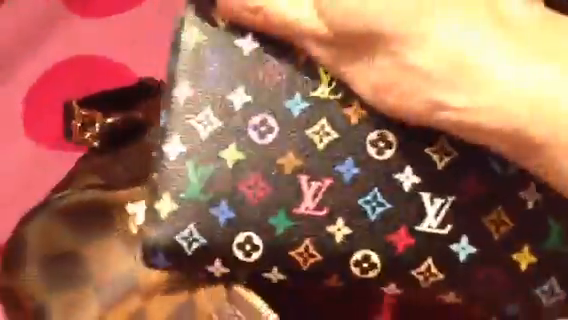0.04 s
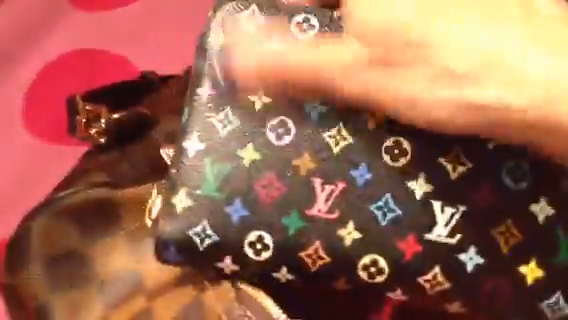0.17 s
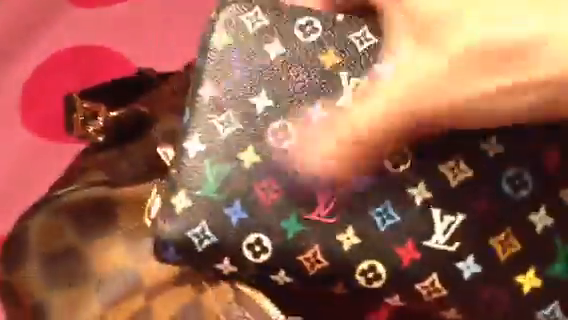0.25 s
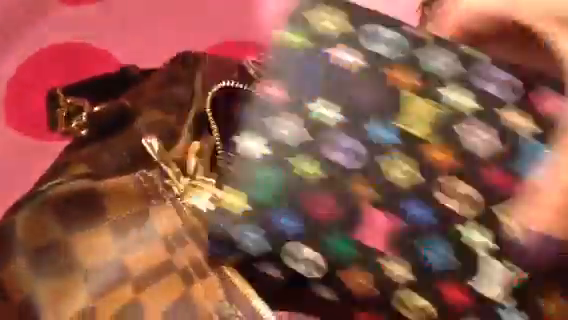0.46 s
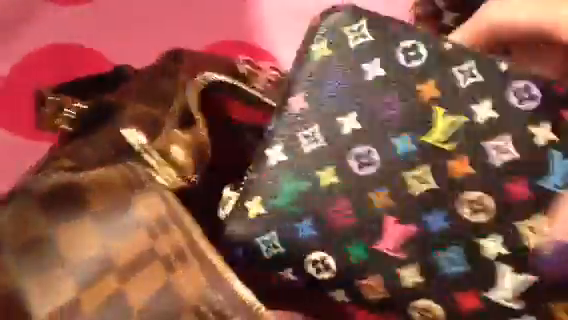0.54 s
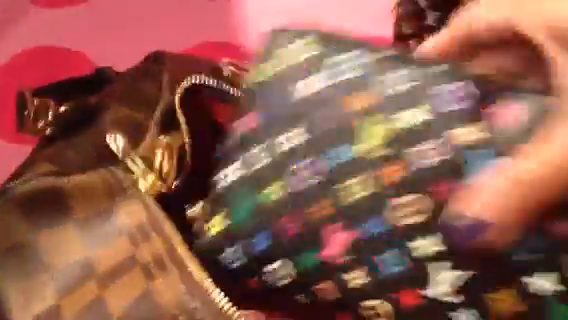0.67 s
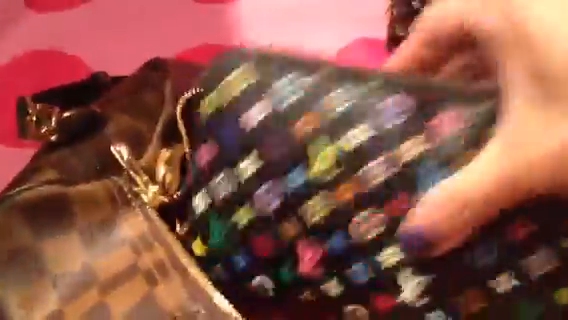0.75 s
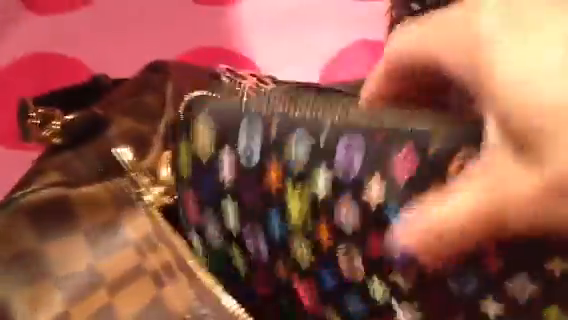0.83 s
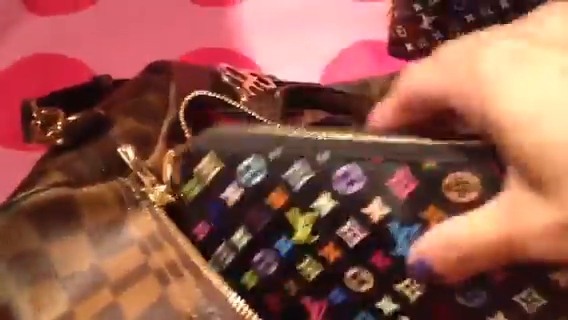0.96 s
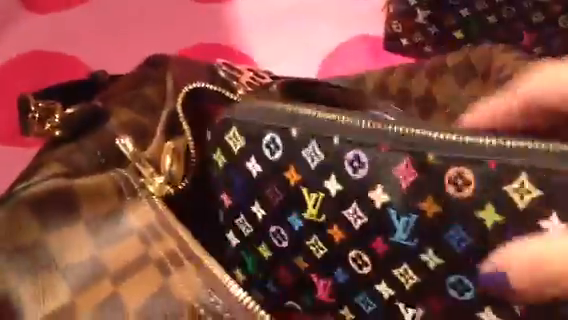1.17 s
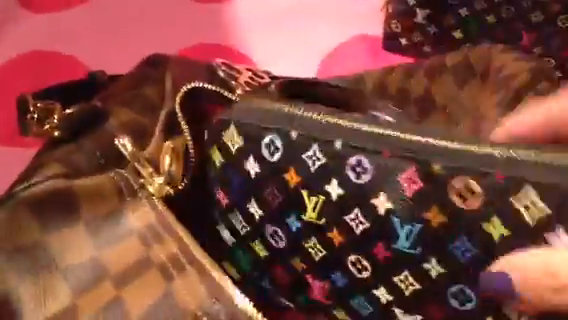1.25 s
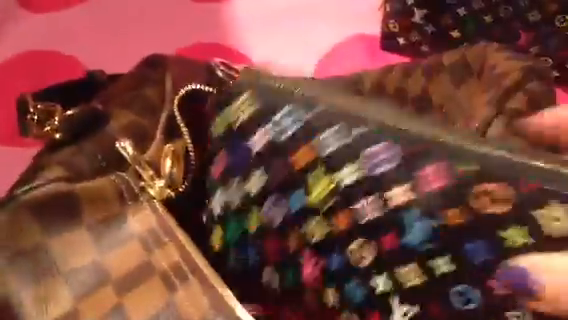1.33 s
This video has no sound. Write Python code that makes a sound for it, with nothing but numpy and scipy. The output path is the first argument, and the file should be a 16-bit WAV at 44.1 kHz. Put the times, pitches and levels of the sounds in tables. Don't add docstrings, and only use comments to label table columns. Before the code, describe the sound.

A stiff coated zip wallet is handled against a soft handbag, heard close and dry. Soft bumps and faint metal ticks open, with a rubbing swish around 0.25-0.35 s. The loudest knocks, hollow thumps and zip snaps cluster at 0.42-0.5 s, followed by crisp ticks to 0.6 s. After a lull, creaks and knocks return at 0.7-0.95 s, brightest near 0.88 s; sparse light clicks fade into quiet room hiss until 1.4 s.

```python
import sys
import numpy as np
from scipy import signal
from scipy.io import wavfile

SR = 44100
rng = np.random.default_rng(int(sys.argv[2]) if len(sys.argv) > 2 else 0)


def persist_wave(psi):
    counts = np.round(np.clip(psi, -1, 1) * 32767).astype(np.int16)
    wavfile.write(sys.argv[1], SR, np.atleast_2d(counts).T)


def ratio_of_db(decibels):
    return 10 ** (np.asarray(decibels, float) / 20)


N = 61739

# pitch_hz, level_db, t60_s
PANEL_MODES = [(470, -10, .016), (620, -9, .014), (870, -9, .018), (1070, -7, .02), (1240, -3, .022),
               (1370, 0, .024), (1560, -8, .018), (1960, -2, .024), (2350, -7, .018), (2770, -12, .014),
               (3400, -10, .014), (4400, -12, .01)]


def rms_one(x):
    return x / np.sqrt(np.mean(x ** 2) + 1e-20)


def peak_one(x):
    return x / np.max(np.abs(x))


def filtered(x, order, hz, kind="low"):
    return signal.sosfilt(signal.butter(order, hz, kind, fs=SR, output="sos"), x)


def in_time(rows):
    time_s, level_db = np.transpose(rows)
    return np.interp(np.arange(N) / SR, time_s, level_db)


def drift(rate_hz):
    r = np.exp(-2 * np.pi * rate_hz / SR)
    settle = 8000
    noise = rng.standard_normal(N + settle)
    return rms_one(signal.lfilter([1], [1, -2 * r, r * r], noise)[settle:])


def ring(x, hz, t60_s):
    r = ratio_of_db(-60 / (max(t60_s, .001) * SR))
    w = 2 * np.pi * hz / SR
    return signal.lfilter([0, np.sin(w)], [1, -2 * r * np.cos(w), r * r], x + 1e-18)


def grains(per_s, spread_db):
    excess = np.minimum(rng.exponential(1, N), 3)
    sizes = ratio_of_db(spread_db * excess) * rng.choice([-1, 1], N)
    return sizes * (rng.random(N) < per_s / SR)


def coloured(pair, spectrum, patch_db, tilt_db):
    out = 0
    edges_hz = 30 * 2 ** np.arange(0, 9.4, 1 / 3)
    hz, db = np.transpose(spectrum)
    for k, (low, high) in enumerate(zip(edges_hz, edges_hz[1:])):
        band = filtered(pair[k % 2], 2, [low, high], "band")
        mid = np.sqrt(low * high)
        gain_db = np.interp(np.log(mid), np.log(hz), db) + patch_db * drift(22.5)
        out = out + band * ratio_of_db(gain_db + tilt_db * np.log2(mid / 4000))
    return rms_one(out)


def contact(noise, length_s):
    phase = np.clip(np.arange(len(noise)) / SR / max(length_s, 3e-4), 0, 1)
    return rms_one(noise * np.sin(np.pi * phase ** 0.4)) / np.sqrt(len(noise))


def add(out, start_s, x):
    i = int(start_s * SR)
    out[i:i + len(x)] += x[:N - i]


def rub():
    # time_s, level_db
    rub_speed = [(0, -63.5), (.09, -68), (.125, -57.5), (.26, -48.5), (.335, -49.5), (.36, -61.5),
                 (.39, -55), (.48, -52.5), (.525, -54.5), (.555, -55), (.63, -71.5), (.685, -64.5),
                 (.7, -62), (.86, -59.5), (.905, -50), (.97, -62.5), (1.06, -64.5), (1.08, -58),
                 (1.4, -65.5)]
    # frequency_hz, density_db (per Hz)
    rub_colour = [(500, -3), (1100, -10), (2000, -3), (4000, -1.5), (7800, -7.5), (10500, -18),
                  (13500, -20.5), (15500, -37)]
    level_db = in_time(rub_speed)
    slips = [grains(per_s=6000, spread_db=2.5) for source in range(2)]
    finer_db = 0.11 * (level_db - level_db.mean())
    return ratio_of_db(level_db + drift(44)) * coloured(slips, rub_colour, 2.5, finer_db)


def grip():
    # time_s, level_db
    grip_pressure = [(0, -57.5), (.1, -95.5), (.15, -69), (.4, -59.5), (.44, -45.5), (.51, -51.5),
                     (.57, -56), (.63, -79), (.685, -69), (.7, -47), (.79, -54.5), (.86, -51.5), (.92, -50),
                     (.97, -64.5), (1.03, -58.5), (1.05, -65), (1.1, -79), (1.4, -60)]
    # pitch_hz, level_db, t60_s
    cavity_modes = [(165.0, -3, 0.045), (239, -7.0, 0.055), (297, 0.5, 0.033), (347, 3, 0.024)]
    slips_per_s, bag_spread_db, creak_spread_db = 990, 2, 9
    bag = sum(ratio_of_db(db) * ring(grains(slips_per_s, bag_spread_db), hz, t60_s)
              for hz, db, t60_s in cavity_modes)
    creak = sum(ratio_of_db(db) * ring(grains(slips_per_s, creak_spread_db), hz, t60_s)
                for hz, db, t60_s in PANEL_MODES[1:8])
    mutter = ratio_of_db(-5 + 1.8 * drift(34)) * rms_one(filtered(bag, 2, 480))
    creak = ratio_of_db(-6 + 1.6 * drift(30)) * rms_one(creak)
    return ratio_of_db(in_time(grip_pressure)) * (mutter + creak)


def room_tone():
    # frequency_hz, density_db (per Hz)
    floor_colour = [(30, 29.5), (70, 5.5), (160, 8), (320, -2), (800, -7), (4400, -16), (8000, -29),
                    (10500, -23), (14500, -20.5)]
    noise = rng.standard_normal((2, N))
    return ratio_of_db(-62) * coloured(noise, floor_colour, patch_db=2.1, tilt_db=0.5)


def bumps():
    # start_s, level_db (peak), pitch_hz
    bag_pushes = [(0.008, -45.5, 294), (0.053, -48, 260), (0.067, -46, 274), (0.098, -49, 240),
                  (0.128, -46.5, 207), (0.142, -41, 310), (0.162, -45.5, 350), (0.217, -44.5, 288),
                  (0.239, -51.5, 362), (0.297, -42, 258), (0.331, -41, 320), (0.4212, -34.5, 257),
                  (0.4427, -25.5, 292), (0.4483, -30, 295), (0.4563, -34.5, 287), (0.4636, -40, 303),
                  (0.469, -28.5, 292), (0.4815, -23.5, 267), (0.497, -25, 301), (0.559, -40, 273),
                  (0.6952, -39, 329), (0.728, -44.5, 362), (0.762, -42, 297), (0.8241, -36.5, 430),
                  (0.876, -32.5, 333), (0.952, -46, 292), (1.029, -61, 286), (1.09, -38, 367),
                  (1.116, -45.5, 320), (1.276, -47.5, 399), (1.337, -50.5, 362), (.114, -55, 305),
                  (0.203, -56, 270), (0.265, -56, 308), (.320, -46, 295), (.351, -45, 300),
                  (0.362, -46, 334), (0.375, -42, 288), (.517, -44, 270), (.527, -37, 272),
                  (0.912, -43, 262), (0.983, -56, 270), (1.154, -55, 270), (1.226, -61, 385),
                  (1.298, -56, 306), (1.365, -51, 365)]
    out = np.zeros(N)
    soft = filtered(np.eye(1, 6000)[0], 2, 552)
    for start_s, level_db, pitch_hz in bag_pushes:
        add(out, start_s, ratio_of_db(level_db) * ring(soft, pitch_hz, t60_s=0.042))
    return filtered(out, 1, 163, "high")


def knocks():
    knock_times = [.113, .127, .145, .243, .427, .443, .4495, .456, .4643, .480, .4968, .650, .695, .701,
                   .710, .730, .738, .770, .807, .8245, .856, .873, .878, .900, .921, .956, 1.082, 1.089,
                   1.339, 1.365, .170, .368, .946, .7205, .746, 1.229, 1.262, 1.032, .4825]
    # level_db (peak), contact length_s, brightness_db (per octave)
    knock_kinds = [(-41.5, 0.003, -17), (-41, 0.0021, -22), (-43, 0.0014, -29), (-37, 0.0039, -33),
                   (-35.5, 0.0044, 2), (-27, 0.00074, -12), (-22.5, 0.00026, -11), (-34.5, 0.00036, 0),
                   (-29.5, 0.00081, -3), (-27, 0.00048, -9), (-35, 0.0014, -18), (-61, 0.0015, 3),
                   (-39, 0.0054, -6), (-39, 0.0065, 2), (-38, 0.0028, -16), (-37, 0.0039, 0),
                   (-42, 0.011, -8), (-39, 0.0073, -7), (-38.5, 0.0021, -6), (-27, 0.0057, -7.5),
                   (-39, 0.027, 0), (-30.5, 0.0075, 9.5), (-24.5, 0.0058, -1.5), (-34, 0.015, 3),
                   (-43, 0.0065, -16), (-43.5, 0.011, -8), (-39.5, 0.0034, -6), (-47, 0.0042, -4),
                   (-44, 0.0035, -8), (-44.5, 0.0045, -1), (-41.5, 0.0032, 3), (-44, 0.0037, -10),
                   (-45, 0.0022, -9), (-48, 0.0064, 8), (-47, 0.0022, -8), (-49.5, .002, -19),
                   (-43.5, .004, -7), (-43.5, 0.0032, 12), (-31, 0.0026, -6)]
    scatter_db, damping, trim_db = 1.5, .85, -2.5
    out = np.zeros(N)
    noise = rng.standard_normal((len(knock_kinds), 2000))
    scatter = rng.standard_normal((len(knock_kinds), len(PANEL_MODES)))
    for start_s, (level_db, length_s, bright_db), row, uneven in zip(knock_times, knock_kinds, noise, scatter):
        touch = contact(row, length_s)
        body = 0
        for (hz, mode_db, t60_s), chance in zip(PANEL_MODES, uneven):
            gain_db = mode_db + scatter_db * chance + (bright_db + 4) * np.log2(hz / 1350)
            body = body + ratio_of_db(gain_db) * peak_one(ring(touch, hz, damping * t60_s))
        add(out, start_s, ratio_of_db(level_db + trim_db) * peak_one(body))
    return filtered(out, 1, [350, 4800], "band")


def snaps():
    # start_s, level_db (peak)
    tooth_skips = [(0.1136, -44), (.1455, -37.5), (.1785, -36.5), (0.4427, -37), (0.452, -56),
                   (.4563, -25.5), (0.4666, -42), (0.497, -25), (0.6957, -35.5), (0.2929, -48),
                   (0.3697, -58), (0.479, -41), (0.6506, -51), (0.773, -58), (.8075, -54), (1.069, -44)]
    out = np.zeros(N)
    click = peak_one(filtered(np.eye(1, 400)[0], 3, [500, 5500], "band"))
    for start_s, level_db in tooth_skips:
        add(out, start_s, -ratio_of_db(level_db) * click)
    return out


def pings():
    # start_s, level_db (peak)
    tab_taps = [
        (0.14, -50.5),
        (0.177, -50.5),
    ]
    # pitch_hz, level_db, t60_s
    tab_modes = [(5400, -10, .04), (8125, 0, .05), (13750, -9, .05)]
    taps = np.zeros(N)
    for start_s, level_db in tab_taps:
        taps[int(start_s * SR)] = ratio_of_db(level_db)
    return sum(ratio_of_db(db) * ring(taps, hz, t60_s) for hz, db, t60_s in tab_modes)


def ticks():
    tick_times = [.151, .1782, .292, .369, .481, .4968, .4968, .503, .534, .5408, .5412, .5465, .552, .6,
                  .8245, .879, .892, .896, .902, .905, .916, .922, .945, .955, 1.068, 1.083, 1.262, 1.366,
                  .828, .879, .873, .5035, .541, .547, .272, .266, .47, .439, .6505, .7, 1.242, 1.263,
                  .5415, .547, .553, .458, .473, .534, .877, .8255, 1.083, 1.0895, 1.3395, 1.3665, .905]
    # level_db (peak), pitch_hz, contact length_s
    tick_kinds = [(-51, 8400, 0.0033), (-48, 6400, 0.0022), (-38.5, 4400, 0.0018), (-49, 2400, .002),
                  (-37.5, 4400, 0.0023), (-36, 4100, 0.0037), (-42.5, 10000, 0.0017), (-36, 2800, .004),
                  (-35, 4100, 0.0047), (-34.5, 10360, 0.0017), (-31.5, 4220, 0.0056), (-39, 4900, 0.0031),
                  (-39.5, 3650, 0.0045), (-49.5, 2400, 0.0088), (-35, 4970, 0.0093), (-37, 3470, 0.007),
                  (-44, 6900, 0.0037), (-52, 6800, 0.0042), (-44, 6900, 0.0011), (-34, 7700, 0.0046),
                  (-49.5, 7200, 0.0027), (-43.5, 5180, .005), (-47, 7900, 0.0035), (-47, 6300, 0.0066),
                  (-57, 6300, 0.0022), (-45, 3250, 0.012), (-54.5, 3240, 0.0038), (-49, 4100, 0.0051),
                  (-42, 5400, .002), (-46, 12000, 0.0031), (-56, 11000, 0.0074), (-41, 16000, 0.0014),
                  (-60, 15200, 0.00069), (-38, 7700, 0.0031), (-43, 2600, 0.0043), (-45.5, 2170, 0.0033),
                  (-56, 4200, 0.0051), (-39, 3040, 0.0082), (-55, 2200, 0.0028), (-47, 3800, 0.0028),
                  (-50, 3000, 0.002), (-46, 2360, 0.0042), (-35, 2300, 0.0011), (-39.5, 2400, 0.009),
                  (-46, 3500, 0.0092), (-43, 3100, 0.0065), (-47, 4200, 0.016), (-52, 9400, .002),
                  (-34.5, 2000, 0.0067), (-38, 1980, 0.0074), (-43, 1420, 0.0033), (-41, 1500, 0.0088),
                  (-47.5, 1400, 0.0034), (-49.5, 2030, .003), (-39.5, 1880, 0.0054)]
    decay_cycles, crack_db, trim_db = 9, -6, -1
    out = np.zeros(N)
    noise = rng.standard_normal((len(tick_kinds), 1500))
    for start_s, (level_db, pitch_hz, length_s), row in zip(tick_times, tick_kinds, noise):
        band_hz = np.minimum(np.multiply((.55, 1.6), pitch_hz), 17e3)
        crack = filtered(contact(row, length_s), 2, band_hz, "band")
        t60_s = decay_cycles / pitch_hz
        tone = ring(ring(crack, pitch_hz, t60_s), pitch_hz, t60_s)
        add(out, start_s, ratio_of_db(level_db + trim_db) * (peak_one(tone) + ratio_of_db(crack_db) * peak_one(crack)))
    return out


def scene():
    handling = rub() + grip() + bumps() + knocks()
    metal = snaps() + pings() + ticks()
    return (handling + metal + room_tone())[None]


def roll_off(x):
    return signal.sosfilt(signal.butter(12, 15680, fs=SR, output="sos"), x)


def record(dry):
    thin = filtered(dry, 4, 147, "high")
    dip_hz, dip_q, dip_share = 10300, 2.5, 0.58
    dipped = thin - dip_share * signal.lfilter(*signal.iirpeak(dip_hz, dip_q, fs=SR), thin)
    top_cut = signal.cheby2(12, 30, 15650, fs=SR, output="sos")
    return roll_off(signal.sosfilt(top_cut, dipped))


dry = scene()
out = record(dry)
persist_wave(out)
```